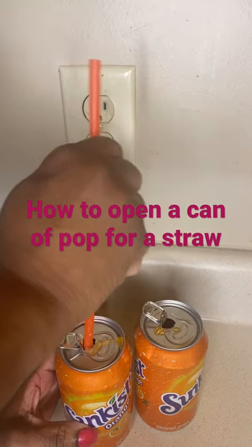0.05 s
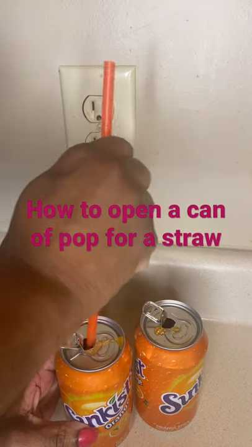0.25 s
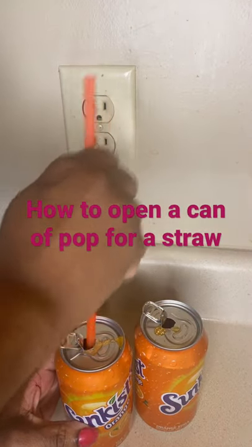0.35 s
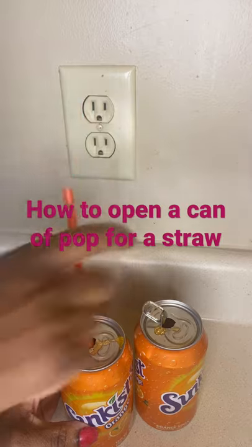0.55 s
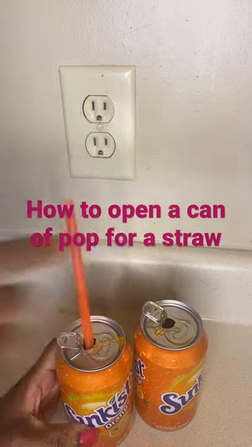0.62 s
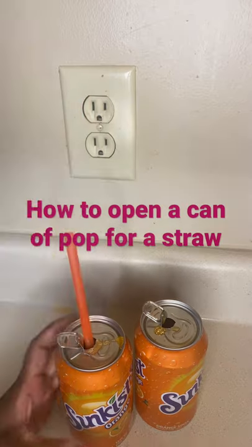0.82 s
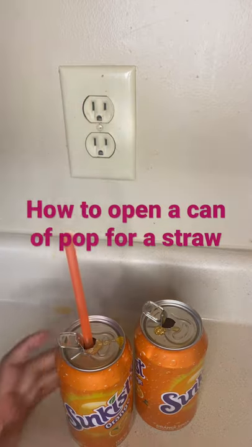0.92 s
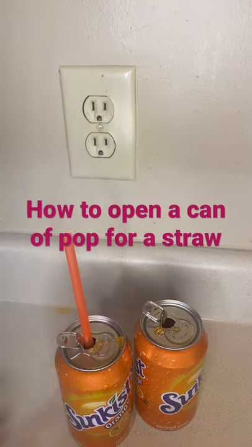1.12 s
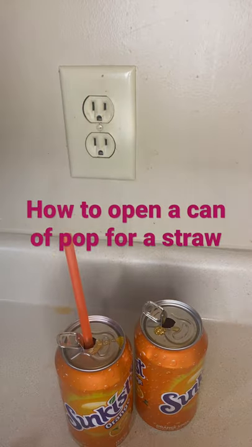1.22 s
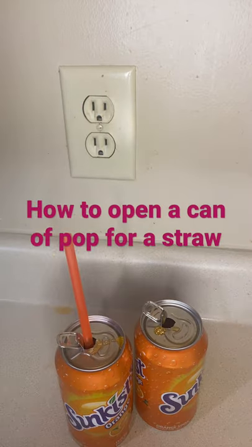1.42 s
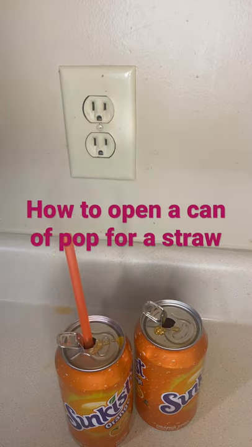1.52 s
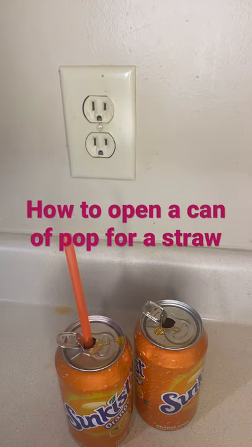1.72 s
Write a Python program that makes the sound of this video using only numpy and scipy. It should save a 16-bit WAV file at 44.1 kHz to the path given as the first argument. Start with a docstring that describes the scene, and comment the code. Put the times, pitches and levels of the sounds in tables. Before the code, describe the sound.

A soda can lid pops sharply at about 0.2 seconds as a plastic straw is pushed through, close by. The straw rasps and squeaks on the rim until 0.5 seconds, with light metallic taps continuing to about 1.1 seconds and a few dull bumps on the counter. Soft fizzing builds around 0.8 seconds and fades after 1.3, with one small bubble bursting near 1.6. An appliance hums faintly throughout.

```python
"""Straw through a soda can lid

A plastic straw is pushed into a soda can on a kitchen counter, heard from close by. The lid
buckles with a sharp pop. The straw knocks on the metal and rubs on the rim, so the can rings,
rasps and squeaks. The stirred soda fizzes as its bubbles burst, then settles. Handling the can
adds dull bumps, and an appliance hums low in the small room."""
import sys
import numpy as np
from scipy import signal
from scipy.fft import rfft, irfft
from scipy.io import wavfile
from scipy.ndimage import uniform_filter1d

SR = 44100
rng = np.random.default_rng(int(sys.argv[2]) if len(sys.argv) > 2 else 0)


def digitize_waveform(pressure):
    """Quantize a signal to 16-bit integers and store it at the path in sys.argv[1].

    Rows of a 2-D input are taken as channels; values are limited to [-1, 1].
    """
    field = np.atleast_2d(pressure).T
    bounded = np.clip(field, -1, 1)
    quanta = np.round(bounded * 32767).astype(np.int16)
    wavfile.write(sys.argv[1], SR, quanta)


N = 77175  # 1.75 seconds

# A fade time is how long a sound takes to drop by 60 dB. A spectrum sets the tone of a noise.
# The notes of the can when it rings freely: pitch_hz, relative_db, fade_s
CAN_NOTES = [(538, -15.5, .09), (1064, 0.5, 0.088), (1163, 1.5, 0.056), (1422, 2.5, 0.096),
             (1470, -18, 0.031), (1913, -11, 0.036), (2060, -10, 0.068), (3110, 2, .08), (3484, -17, 0.085),
             (4014, -3.5, 0.09), (4640, -0.5, .11), (4820, -6.5, .11), (5970, -11, 0.11), (6570, -1, 0.054),
             (7155, -1, 0.044)]
REGISTER_EDGES_HZ = (1300, 2500)  # split those notes into low, middle and high
# Spectrum of the thin metal wall's many crowded notes: pitch_hz, relative_db
SHELL_SPECTRUM = [(200, -11.5), (330, -9), (600, -21), (770, -24), (1100, -11), (1600, -17.5), (2000, 1),
                  (2330, -20), (2570, 0.5), (2850, -12), (3200, 0.5), (4600, -2.5), (5100, -4.5), (6000, 3),
                  (7000, 1), (8300, -6.5), (10000, -13.5), (15500, -17)]
# Brief swings of the buckling lid: pitch_hz, level_before_fade_db, length_s
LID_SWINGS = [(534, -48, 0.018), (1084, -31.5, 0.017), (1420, -24, 0.01), (1977, -31.5, 0.0097)]
# Snaps of the lid giving way: start_s, level_db
LID_SNAPS = [(.2140, -35.5), (0.2168, -27), (0.219, -28.5)]
POP_START_S, SNAP_RISE_S, TAP_RISE_S = 0.2143, 0.00071, 0.00074

# Knocks of the straw: start_s, low_db, middle_db, high_db, tick_db, share_of_free_fade_time
STRAW_TAPS = [(0.121, -71.5, -72, -88, -82, 0.47), (.144, -67, -75, -88, -67, 0.49),
              (.2025, -56.5, -62, -71, -76, 0.52), (0.319, -56, -58, -73, -80, 0.78),
              (.407, -60, -56.5, -83, -81, 0.71), (0.471, -71, -56.5, -76, -60, 0.8),
              (0.505, -59, -59, -70, -74, 0.53), (0.5885, -48.5, -54, -84, -51, 0.48),
              (0.6246, -67, -64.5, -79, -56, 0.85), (0.726, -59, -49.5, -78, -52, .85),
              (0.854, -67, -71, -82, -56, 0.77), (0.991, -73, -58, -79, -78, 0.67),
              (1.059, -72, -65.5, -90, -82, 0.51)]
# Spectrum of the tick of plastic on metal: pitch_hz, relative_db
TICK_SPECTRUM = [(300, 6.5), (700, 5.5), (2000, 3), (2500, -17), (3000, -11), (3800, 1), (5400, 2),
                 (6400, -1), (8000, -3.5), (11000, -10.5), (15500, -17)]
# How loud the rubbing is over time: time_s, ring_db, rasp_db
SCRAPE_LEVELS = [(.10, -95, -100), (.125, -80, -91), (.148, -70, -84), (.168, -90, -101.5),
                 (.195, -94, -85), (.212, -46, -61), (.265, -62.5, -68), (.305, -70, -71.5),
                 (.325, -57.5, -64), (.365, -61.5, -59.5), (.395, -62.5, -59.5), (.44, -64, -68.5),
                 (.475, -55, -71), (.495, -70, -69), (.512, -62.5, -72), (.535, -90, -97),
                 (.58, -100, -100)]
# Spectrum of the straw's rasp: pitch_hz, relative_db
RASP_SPECTRUM = [(400, -11), (800, -46), (1100, 3), (2000, -10), (2800, -23), (3500, 1), (4400, -1),
                 (5100, -1), (6300, 6.5), (7500, 1), (9000, -5.5), (11000, -8.5), (13900, -7.5),
                 (15500, -10)]
# The notes of the can with the straw pressed on it: pitch_hz, width_hz, relative_db
RUBBED_NOTES = [(1050, 120, -7), (1411, 31, -.5), (1914, 49, -5.5), (2052, 41, -3.5), (3345, 82, -10),
                (4107, 69, -10.5), (4510, 86, -9.5), (5320, 50, -13), (6450, 22, -24), (8130, 180, -16)]
# Squeaks as the straw catches: middle_s, pitch_hz, level_db, length_s
STRAW_SQUEAKS = [(0.33, 4480, -66, 0.064), (0.352, 1980, -62.5, 0.053), (0.371, 6560, -60, 0.062),
                 (.374, 13850, -68, 0.092), (0.42, 4500, -65, 0.072), (0.467, 4270, -64, 0.06)]
SLIPS_PER_S, SCRAPE_WOBBLE_DB, SQUEAK_WANDER_HZ, SQUEAK_FLUTTER_DB = 2600, 0.3, 70.3, 3

# How loud the fizz is over time: time_s, foam_db, spray_db
FIZZ_LEVELS = [(0, -95, -100), (.3, -79, -85), (.58, -75, -102), (.7, -77.5, -94), (.79, -72, -81),
               (.85, -70, -79), (.95, -69.5, -85), (1.03, -71, -79.5), (1.09, -72.5, -85),
               (1.15, -68.5, -73), (1.21, -73.5, -73.5), (1.28, -74.5, -79.5), (1.35, -75, -84),
               (1.43, -81, -84.5), (1.75, -95, -97)]
# Spectrum of the bursting foam: pitch_hz, relative_db
FOAM_SPECTRUM = [(700, 1.5), (1300, 5), (2100, 1.5), (2800, -2.5), (4200, -1), (7000, -1.5), (9000, -8),
                 (15500, -11)]
# Spectrum of the finest spray: pitch_hz, relative_db
SPRAY_SPECTRUM = [(2000, -16), (5000, 9), (8000, 3), (12000, 7), (15500, -8.5)]
BURSTS_PER_S = 9000
# One larger bubble: start_s, pitch_hz, level_db, fade_s
BIG_BUBBLE = [(1.585, 4760, -62, 0.031)]

# Dull bumps of hand and can on the counter: start_s, pitch_hz, level_db, fade_s
COUNTER_BUMPS = [(0.447, 442, -52.5, 0.072), (.474, 540, -51.5, 0.038), (.481, 308, -52, 0.043),
                 (.591, 436, -59.5, 0.088), (.595, 690, -68.5, 0.33), (.859, 138, -47.5, 0.074),
                 (1.125, 433.4, -58, 0.16)]
# The tones of the appliance hum: pitch_hz, level_db
HUM_TONES = [(59.5, -67.5), (119.9, -71), (211.8, -80.5), (359, -79.5), (422, -74)]
# Spectrum of the room's still air: pitch_hz, relative_db
AIR_SPECTRUM = [(25, -37), (42, -30), (56, -8), (78, -4.5), (100, 6), (135, -6.5), (280, -9.5), (420, -8),
                (650, -13), (900, -19), (1700, -24), (2700, -31), (4500, -31), (7500, -33), (9000, -39.5),
                (14000, -40), (15500, -57)]
# Spectrum of the room's echo: pitch_hz, relative_db
ECHO_SPECTRUM = [(200, 3), (6000, -5), (15000, -6.5)]
AIR_DB, ECHO_DB = -65, -15.5
BASS_CUT_HZ, TREBLE_CUT_HZ = 42, 15600


def lid_pop():
    """The lid buckles with a few sharp snaps and leaves the whole can ringing."""
    out = can_ring(POP_START_S, register_db=(-36, -40.5, -44), fade_share=0.75)
    out += undb(-38.5) * decay(POP_START_S, fade_s=0.16, rise_s=SNAP_RISE_S) * noise(SHELL_SPECTRUM)
    for pitch_hz, level_db, length_s in LID_SWINGS:
        shape = swell(POP_START_S, length_s) * decay(POP_START_S, 5.6 * length_s, SNAP_RISE_S)
        out += undb(level_db) * shape * tone(POP_START_S, pitch_hz)
    for start_s, level_db in LID_SNAPS:
        out += undb(level_db) * decay(start_s, fade_s=0.035, rise_s=SNAP_RISE_S) * noise(SHELL_SPECTRUM)
    return out


def can_ring(start_s, register_db, fade_share):
    """A struck can sounds all its notes at once. A smaller fade_share stops them sooner."""
    out = 0
    for pitch_hz, note_db, fade_s in CAN_NOTES:
        register = np.searchsorted(REGISTER_EDGES_HZ, pitch_hz)  # 0 low, 1 middle, 2 high
        out += ring(start_s, pitch_hz, note_db + register_db[register], fade_s * fade_share, TAP_RISE_S)
    return out


def straw_taps():
    """Each knock makes a bright tick and a ring, cut short by the hand on the can."""
    tick = noise(TICK_SPECTRUM)
    out = 0
    for start_s, low_db, middle_db, high_db, tick_db, fade_share in STRAW_TAPS:
        out += can_ring(start_s, (low_db, middle_db, high_db), fade_share)
        out += undb(tick_db) * decay(start_s, fade_s=0.045, rise_s=TAP_RISE_S) * tick
    return out


def straw_scrape():
    """The straw sticks and slips on the rim. The tiny jerks rasp and also make the can ring."""
    slips = clicks(SLIPS_PER_S) * undb(SCRAPE_WOBBLE_DB * wander(60))
    ringing = 0
    for pitch_hz, width_hz, level_db in RUBBED_NOTES:
        note_filter = signal.iirpeak(pitch_hz, pitch_hz / width_hz, fs=SR)
        ringing += undb(level_db) * unit(signal.lfilter(*note_filter, slips))
    ringing = unit(signal.sosfilt(signal.butter(2, 800, "high", fs=SR, output="sos"), ringing))
    rasp = colour(slips, RASP_SPECTRUM)
    return level_curve(SCRAPE_LEVELS, column=1) * ringing + level_curve(SCRAPE_LEVELS, column=2) * rasp


def straw_squeaks():
    """The plastic catches on the rim and gives short, unsteady tones."""
    out = 0
    for middle_s, pitch_hz, level_db, length_s in STRAW_SQUEAKS:
        wavering_hz = pitch_hz + SQUEAK_WANDER_HZ * wander(330)
        phase = 2 * np.pi * np.cumsum(wavering_hz) / SR
        gain = undb(level_db + SQUEAK_FLUTTER_DB * wander(250))
        out += gain * swell(middle_s - length_s / 2, length_s) * np.sin(phase)
    return out


def soda_fizz():
    """Thousands of tiny bubbles burst as the foam rises and settles."""
    foam = level_curve(FIZZ_LEVELS, column=1) * colour(clicks(BURSTS_PER_S), FOAM_SPECTRUM)
    spray = level_curve(FIZZ_LEVELS, column=2) * colour(clicks(BURSTS_PER_S), SPRAY_SPECTRUM)
    return foam + spray


def big_bubble():
    """A larger bubble bursts with a click and a short ping."""
    out = 0
    for start_s, pitch_hz, level_db, fade_s in BIG_BUBBLE:
        click = undb(level_db - 4) * decay(start_s, fade_s=0.032, rise_s=0.0003) * noise(FOAM_SPECTRUM)
        out += click + ring(start_s, pitch_hz, level_db, fade_s, rise_s=0.0004)
    return out


def counter_bumps():
    """Handling the can makes low knocks, softened by their slower rise."""
    return sum(ring(*bump, rise_s=0.0027) for bump in COUNTER_BUMPS)


def room_echo(sound):
    """The wall, counter and room send back a short, quieter wash of the sound."""
    tail = noise(ECHO_SPECTRUM) * decay(start_s=0.0084, fade_s=0.19, rise_s=0.0015)
    tail /= np.sqrt(np.sum(tail ** 2))
    return undb(ECHO_DB) * signal.fftconvolve(sound, tail)[:N]


def hum_and_air():
    """An appliance hums, wavering slightly, over the faint noise of the room's air."""
    hum = 0
    for pitch_hz, level_db in HUM_TONES:
        gain = undb(level_db + 1.43 * wander(6))
        phase = 2 * np.pi * pitch_hz * clock() + 0.23 * wander(5.11)
        hum += np.sqrt(2) * gain * np.sin(phase)
    return hum + undb(AIR_DB) * noise(AIR_SPECTRUM)


def undb(db):
    """Turn decibels into a gain, the number to multiply a sound by."""
    return 10 ** (np.asarray(db) / 20)


def unit(sound):
    """Scale a sound to an average strength (rms) of 1."""
    return sound / np.sqrt(np.mean(sound ** 2))


def clock():
    """The time of every sample, in seconds."""
    return np.arange(N) / SR


def level_curve(table, column):
    """A gain that glides through the levels in one column of a table."""
    rows = np.array(table)
    return undb(np.interp(clock(), rows[:, 0], rows[:, column]))


def colour(sound, spectrum):
    """Shape a sound's bass and treble with a spectrum, then scale it to strength 1."""
    pitch_hz, level_db = np.array(spectrum).T
    every_hz = np.maximum(np.arange(N // 2 + 1) * SR / N, 1)
    gain = undb(np.interp(np.log(every_hz), np.log(pitch_hz), level_db))
    return unit(irfft(rfft(sound) * gain, N))


def noise(spectrum):
    """Steady noise with the given spectrum, at strength 1."""
    return colour(rng.standard_normal(N), spectrum)


def wander(steps_per_s):
    """A smooth random drift, about 1 in size."""
    hold = int(SR / steps_per_s)
    steps = np.repeat(rng.standard_normal(N // hold + 1), hold)
    return unit(uniform_filter1d(uniform_filter1d(steps, hold), hold)[:N])


def clicks(per_s, scatter_db=1.5):
    """Tiny clicks at random times, many weak and a few stronger."""
    size = undb(scatter_db * np.minimum(rng.exponential(size=N), 4))
    happens = rng.random(N) < per_s / SR
    return happens * rng.choice([-1, 1], N) * size


def decay(start_s, fade_s, rise_s):
    """The loudness shape of a hit: a quick rise, then a fade."""
    age_s = np.maximum(clock() - start_s, 0)
    return (1 - np.exp(-age_s / rise_s)) * np.exp(-np.log(1000) * age_s / fade_s)


def swell(start_s, length_s):
    """A loudness shape that rises and falls once."""
    return np.sin(np.pi * np.clip((clock() - start_s) / length_s, 0, 1))


def tone(zero_s, pitch_hz):
    """A steady pure tone of strength 1 whose wave crosses zero at zero_s."""
    return np.sqrt(2) * np.sin(2 * np.pi * pitch_hz * (clock() - zero_s))


def ring(start_s, pitch_hz, level_db, fade_s, rise_s):
    """One struck note that dies away."""
    return undb(level_db) * decay(start_s, fade_s, rise_s) * tone(start_s, pitch_hz)


def scene():
    """Mix the can, straw and soda with the room, in one channel."""
    close = lid_pop() + straw_taps() + straw_scrape() + straw_squeaks()
    close += soda_fizz() + big_bubble() + counter_bumps()
    return (close + room_echo(close) + hum_and_air())[None]


def record(dry):
    """Cut away the deepest bass and the highest treble."""
    bass_cut = signal.butter(4, BASS_CUT_HZ, "high", fs=SR, output="sos")
    treble_cut = signal.ellip(10, 0.2, 70, TREBLE_CUT_HZ, fs=SR, output="sos")
    return signal.sosfilt(treble_cut, signal.sosfilt(bass_cut, dry))


dry = scene()
out = record(dry)
digitize_waveform(out)
```